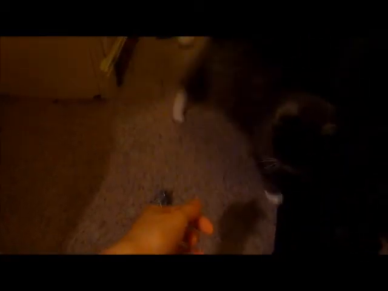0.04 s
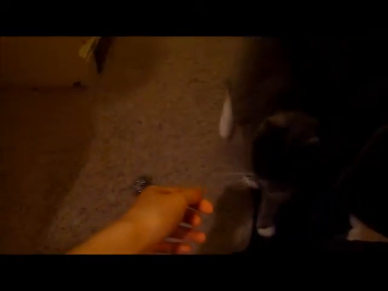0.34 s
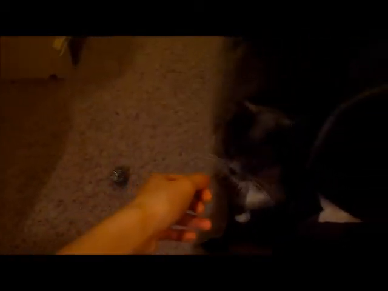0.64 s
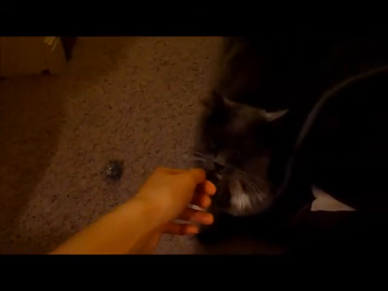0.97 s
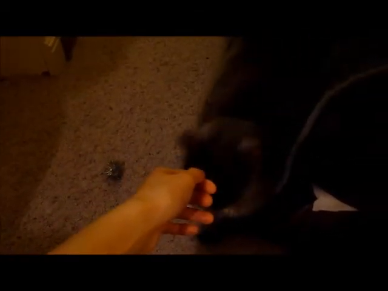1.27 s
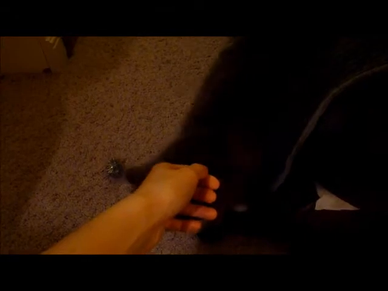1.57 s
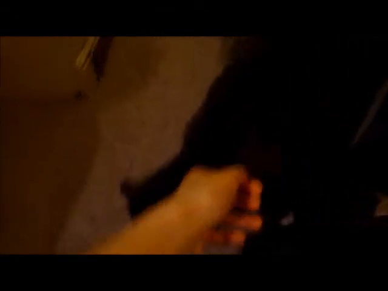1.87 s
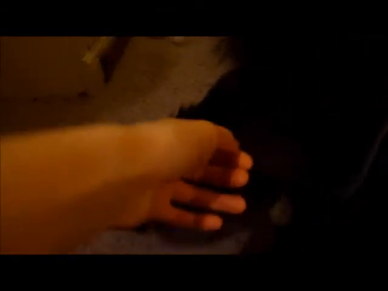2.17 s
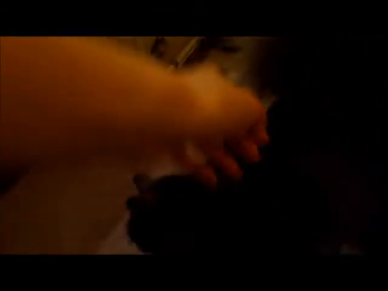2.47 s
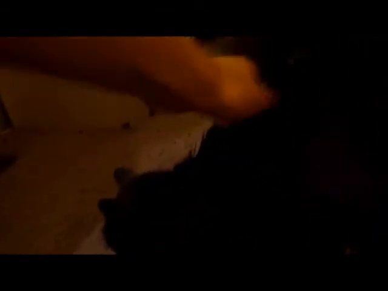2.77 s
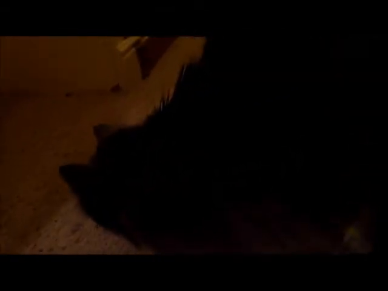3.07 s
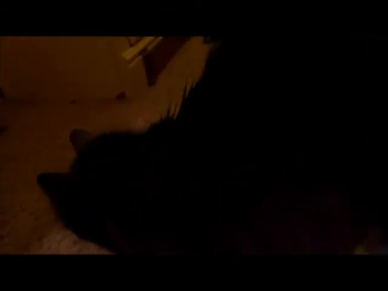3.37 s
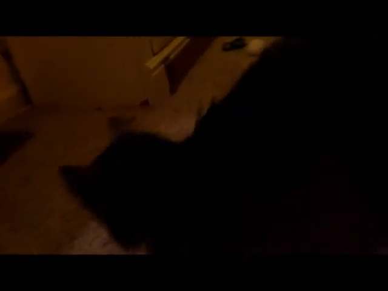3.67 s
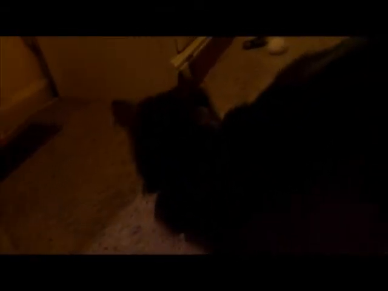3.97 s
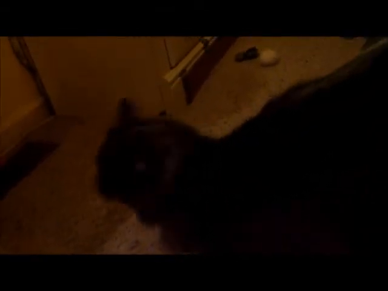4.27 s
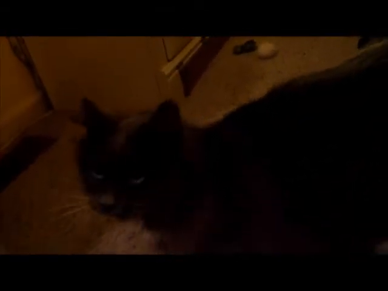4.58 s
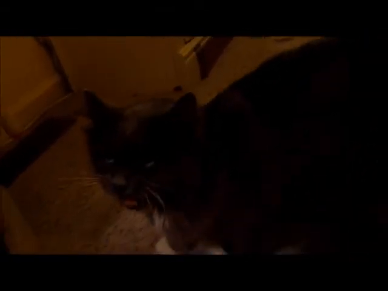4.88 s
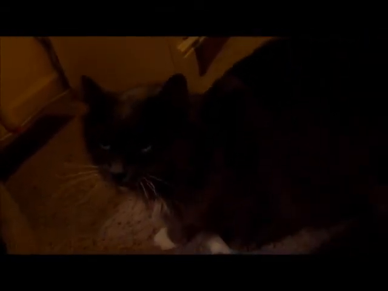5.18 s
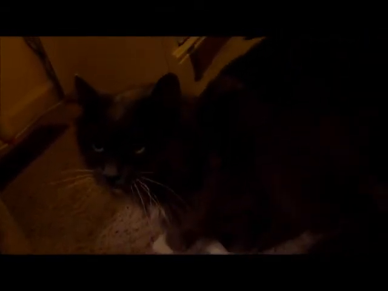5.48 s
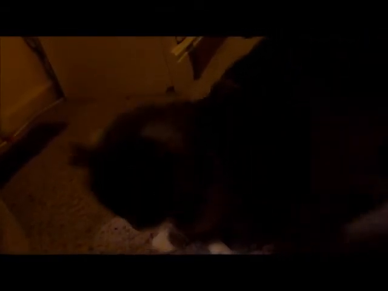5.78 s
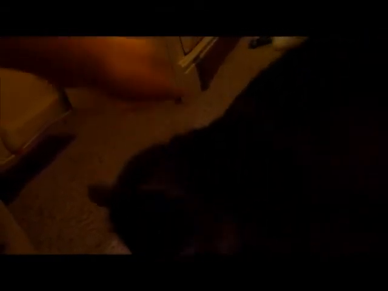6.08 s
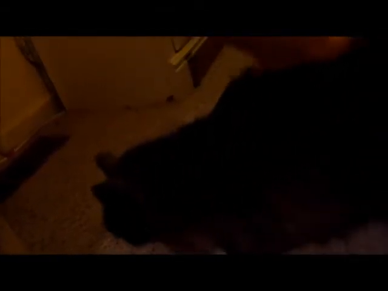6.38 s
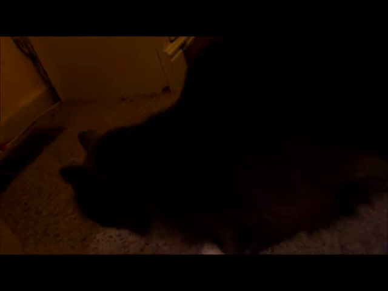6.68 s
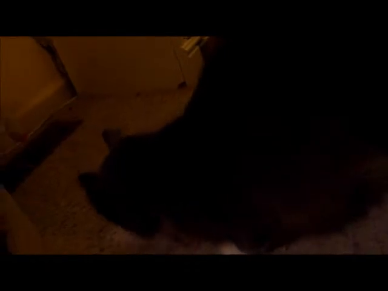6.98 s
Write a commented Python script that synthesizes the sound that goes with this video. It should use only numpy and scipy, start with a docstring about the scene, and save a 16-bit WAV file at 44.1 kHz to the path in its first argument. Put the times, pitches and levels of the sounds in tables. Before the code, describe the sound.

A quiet, carpeted room is heard through a small mono microphone, with low background noise, faint scattered shuffles and a thin fan whine that drops back after the first couple of seconds. A soft bump comes right at the start. At about 1.4 seconds a nearby cat gives a short, bright call that begins as a rolled nasal trill and rises in pitch. From 1.7 to 2.6 seconds a hand strokes its fur, with small sharp clicks and soft bumps close to the microphone. A lower, rolling chirrup follows from 3.3 to 3.8 seconds. At about 4.5 seconds comes the fullest and loudest call, a trill that climbs into an open, slightly raspy meow and ends just after 5 seconds. A last soft, rising trilled murmur sounds from 6.1 to 6.5 seconds, leaving only the quiet room.

```python
"""A fan whines faintly in a quiet room, with light shuffles and one soft bump near a small mono camera.
Close by, a cat gives four short rising calls. Each starts as a rolled trill hummed through the nose,
then brightens and turns a little raspy as the mouth opens. Between the first two calls a hand
strokes its fur, with small clicks and soft bumps near the microphone."""
import sys
import numpy as np
from scipy import signal
from scipy.fft import rfft, irfft, next_fast_len
from scipy.io import wavfile

SR = 44100
rng = np.random.default_rng(int(sys.argv[2]) if len(sys.argv) > 2 else 0)


def unload_wav(signal):
    """Save mono or channel-first audio to the path in sys.argv[1] as 16-bit WAV at rate SR, clipped to [-1, 1]."""
    wavfile.write(
        sys.argv[1],
        SR,
        np.round(np.clip(np.atleast_2d(signal).T, -1, 1) * 32767).astype(np.int16),
    )


N = 314874
T = np.arange(N) / SR


def undb(db):
    return 10 ** (np.asarray(db) / 20)


def unit(x):
    return x / np.sqrt(np.mean(x ** 2))


def ramp(t, length_s):
    """Rise from 0 at t = 0 to 1 after length_s, and stay there."""
    return np.clip(t / length_s, 0, 1)


def eq_gain(points, hz):
    """Gain of an EQ curve of (Hz, dB) points at the given frequencies."""
    f, db = np.transpose(points)
    return undb(np.interp(np.log(np.maximum(hz, 1)), np.log(f), db))


def colour(x, points):
    """Pass x through an EQ curve and set it to rms 1."""
    size = next_fast_len(N)
    hz = np.arange(size // 2 + 1) * SR / size
    return unit(irfft(rfft(x, size) * eq_gain(points, hz), size)[:N])


def drift(rate):
    """Random modulator at rms 1, gliding to a new value rate times a second."""
    knots = rng.standard_normal(N // 8)
    return unit(np.interp(T * rate, np.arange(len(knots)), knots))


def add(out, s, sound):
    """Mix a sound in at time s."""
    i = int(s * SR)
    out[i:i + len(sound)] += sound[:N - i]


# EQ of the room tone: (frequency [Hz], gain [dB])
ROOM_TONE_EQ = [(18, -34), (30, -7.5), (33, -13), (53, -5), (134, 0), (239, -1), (387, -4), (477, -5),
                (673, -7), (909, -8), (996, -7), (1250, -11.5), (1440, -12), (2230, -17), (7400, -24.5),
                (9620, -32.5), (16300, -120)]
def room_tone(level_db=-49):
    """A dark bed of noise whose level barely wanders."""
    return colour(rng.standard_normal(N), ROOM_TONE_EQ) * undb(level_db + 0.58 * drift(1.2))


def fan(hz=1020, width_hz=28, near_db=-59, far_db=-66.5, swing_at_s=0.9, swing_length_s=1.5):
    """A narrow, unsteady whine that drops back as the camera swings away."""
    phase = 2 * np.pi * hz * T
    whine = unit(drift(width_hz) * np.sin(phase) + drift(width_hz) * np.cos(phase))
    return whine * undb(near_db + (far_db - near_db) * ramp(T - swing_at_s, swing_length_s))


def soft_contact(t, hz, decay_s):
    """A padded touch: one tone that swells for a moment and dies away."""
    age = np.log(1000) * t / decay_s
    return age * np.exp(1 - age) * np.sin(2 * np.pi * hz * t)


def shuffles(per_second=2.6, top_db=-47, spread_db=1, centre_hz=950, decay_s=0.011):
    """Paws and hand shift about in faint ticks, scattered over an octave."""
    out, t = np.zeros(N), T[:SR // 15]
    for s, softness, pitch in rng.random((80, 3)) * [80 / per_second, 1, 1]:
        if s < T[-1]:
            tick = soft_contact(t, centre_hz * 2 ** (pitch - .5), decay_s)
            add(out, s, undb(top_db - spread_db * softness) * tick)
    return out


# Soft bumps: (time [s], envelope peak [dB], pitch [Hz], decay [s])
BUMP_HITS = [(0.1548, -34, 98.3, 0.1), (1.7285, -18.5, 223, 0.0075), (1.7770, -33, 547, 0.0082),
             (1.795, -32, 300, 0.011), (1.852, -31.5, 338, 0.011), (1.8705, -30, 149, 0.0099),
             (2.0260, -35, 520, 0.0074), (2.0815, -32, 497, 0.011), (2.0958, -24.5, 160, 0.017),
             (2.1745, -28, 420, 0.0055), (2.5237, -24, 352, 0.023), (2.5296, -27.5, 523, 0.013),
             (2.5340, -19.5, 54.6, 0.011), (2.5510, -30.5, 543, 0.0067)]
def bumps():
    """Padded knocks at the microphone, each gone within a few cycles."""
    out, t = np.zeros(N), T[:SR // 3]
    for s, db, hz, decay_s in BUMP_HITS:
        add(out, s, undb(db) * soft_contact(t, hz, decay_s))
    return out


# Pitch and level envelope of each call: (time [s], pitch [Hz], level of the fundamental [dB])
GREETING_CURVE = [(1.35, 515, -69), (1.362, 506.5, -53), (1.422, 732, -49), (1.464, 714, -42),
                  (1.546, 922, -35), (1.6, 929.9, -32.5), (1.684, 925.1, -36.5), (1.8, 909, -52.5),
                  (1.81, 914.0, -77)]
CHIRRUP_CURVE = [(3.255, 458, -55), (3.285, 473, -49.5), (3.339, 500, -47.5), (3.46, 502, -45),
                 (3.55, 523, -42.5), (3.599, 523.5, -49.5), (3.626, 553.5, -39.5), (3.665, 537, -47.5),
                 (3.745, 567, -47.5), (3.81, 550, -69)]
MEOW_CURVE = [(4.53, 433, -57), (4.6, 530, -40), (4.69, 540.5, -42.5), (4.746, 654, -35),
              (4.785, 693.4, -38), (4.849, 782, -33), (4.934, 914, -35.5), (4.964, 1023, -27.5),
              (5.044, 984, -31), (5.069, 946, -44), (5.15, 870, -77)]
MURMUR_CURVE = [(6.09, 458.6, -56), (6.14, 503.5, -52), (6.205, 536, -46), (6.235, 580, -42),
                (6.315, 641.6, -40), (6.404, 688, -41), (6.42, 575, -50), (6.443, 586, -48),
                (6.468, 550, -68)]
# Mouth formants and rasp EQ, mouth half or wide open: (frequency [Hz], gain [dB])
HALF_MOUTH_EQ = [(1000, -29), (2200, 3), (2750, 5.5), (3050, -7.5), (3350, 2.5), (3700, 0), (4300, -29),
                 (5000, -1), (5800, -12), (6600, -12.5), (7600, -16)]
WIDE_MOUTH_EQ = [(1200, -26), (2200, 5), (2650, -3), (3050, -0.5), (3600, 5.5), (4000, -8), (4500, -2.5),
                 (4900, -11.5), (5500, -2.5), (6200, -20), (6800, -5), (7600, -20.5)]
HALF_RASP_EQ = [(400, -15), (1000, 0), (1700, -3.5), (3200, 7.5), (4500, -12.5), (5800, 3.5), (6700, 7.5),
                (7800, -18.5)]
WIDE_RASP_EQ = [(400, -21.5), (1000, 1), (2000, 1), (3300, 6), (4500, -3.5), (5200, 8.5), (5800, 6.5),
                (6600, 0.5), (7800, -16.5)]
# Rolled start of each call: (time of one crest [s], rate [Hz], vibrato depth [share of pitch],
# tremolo depth [dB], pitch at which the roll is half gone [Hz])
CALL_TRILLS = [(1.436, 28.3, .055, 4, 707), (3.552, 28.27, .08, 0.5, 700), (4.648, 38.5, 0.041, 1, 656),
               (6.241, 25.6, .07, 4, 604)]
# Mouth move of each call: (opens [s], widest [s], shut by [s], overtone rise until widest [dB/s])
CALL_MOUTH_MOVES = [(1.417, 1.697, 1.815, 17), (3.605, 3.68, 3.95, 63), (4.697, 4.97, 5.11, 57),
                    (6.287, 6.394, 6.9, 52)]
# Timbre of each call: (nose level [dB re fundamental], throat formant [Hz], its width [Hz],
# its level [dB], its sag [dB/s], mouth level [dB], mouth treble shelf [dB])
CALL_TIMBRES = [(-6, 1450, 210, -36.5, 10, -54, -2), (-7.5, 1570, 480, -42.5, 62, -67, -2),
                (-2, 1570, 500, -38, 19, -44, 4.5), (-21, 1360, 280, -48, 14, -61, 3)]
# Rasp in each call: (start [s], attack [s], level with the mouth at its widest [dB])
CALL_RASPS = [(1.415, 0.014, -54.5), (3.595, 0.035, -60.5), (4.705, 0.13, -45.5), (6.255, 0.041, -52)]
def cat():
    """A bright greeting, a rolling chirrup, a full meow and a soft murmur; only the meow opens wide."""
    curves = GREETING_CURVE, CHIRRUP_CURVE, MEOW_CURVE, MURMUR_CURVE
    mouth_eqs = HALF_MOUTH_EQ, HALF_MOUTH_EQ, WIDE_MOUTH_EQ, HALF_MOUTH_EQ
    rasp_eqs = HALF_RASP_EQ, HALF_RASP_EQ, WIDE_RASP_EQ, HALF_RASP_EQ
    calls = zip(curves, CALL_TRILLS, CALL_MOUTH_MOVES, CALL_TIMBRES, CALL_RASPS, mouth_eqs, rasp_eqs)
    return sum(call(*parts) for parts in calls)


NOSE_HZ, NOSE_WIDTH_HZ, NOSE_OPEN_SHARE = 1080, 620, 0.16  # the share left once the lips part
OPEN_S, SHUT_S, JAW_DROP_S, CRACK_S, RASP_RELEASE_S = 0.022, 0.039, 0.052, 0.02, 0.055
CLOSING_DB_PER_S, RASP_SLOPE_DB_PER_S = 70, 10
TRILL_FADE_HZ, THIN_ABOVE_HZ, THIN_DB_PER_OCTAVE = 22, 886, 78.5
JITTER, CRACK_JITTER, WAVER = 0.005, 0.028, 0.0054  # shares of pitch
def call(curve, trill, mouth_move, timbre, rasp_swell, mouth_eq, rasp_eq, throb=2.1, shimmer_db=3):
    """Vocal folds hum through the nose, then sound through throat and mouth as the lips part."""
    times, *columns = np.transpose(curve)
    crest_s, trill_hz, trill_depth, tremolo_db, roll_limit_hz = trill
    opens_s, widest_s, shuts_s, rise_db_per_s = mouth_move
    nose_db, throat_hz, throat_width_hz, throat_db, sag_db_per_s, mouth_db, treble_db = timbre
    rasp_s, rasp_attack_s, rasp_db = rasp_swell
    on = (T > times[0]) & (T < times[-1])
    t = T[on]
    hz, db = (np.interp(t, times, column) for column in columns)

    # one flutter rolls pitch and loudness together, dying out as the pitch climbs
    rolling = 1 / (1 + np.exp((hz - roll_limit_hz) / TRILL_FADE_HZ))
    roll = rolling * np.cos(2 * np.pi * trill_hz * (t - crest_s) + 0.28 * drift(25)[on])
    depth, flutter = trill_depth * rolling, trill_depth * roll

    # the parting lips crossfade from nose to throat and mouth; the mouth is brightest at its widest
    parted = ramp(t - opens_s, OPEN_S)
    opening = parted * ramp(min(shuts_s, times[-1]) - t, SHUT_S) ** 2
    jaw = ramp(t - opens_s, JAW_DROP_S)
    from_widest_s = np.abs(t - widest_s)
    mouth_slope = np.where(t < widest_s, rise_db_per_s, CLOSING_DB_PER_S)
    nose_gain = undb(db + nose_db) * (1 - (1 - NOSE_OPEN_SHARE) * parted)
    throat_gain = opening * undb(throat_db - sag_db_per_s * (t - opens_s))
    mouth_gain = opening * jaw * undb(mouth_db - mouth_slope * from_widest_s)
    # tightly stretched folds lose their highest overtones
    shelf_db = treble_db - THIN_DB_PER_OCTAVE * np.maximum(np.log2(hz / THIN_ABOVE_HZ), 0)

    # the folds beat less evenly in the roll, and when the voice cracks as the lips part
    crack = np.exp(-((t - opens_s - OPEN_S) / CRACK_S) ** 2)
    jitter = (JITTER + 0.13 * depth + CRACK_JITTER * crack) * drift(300)[on]
    hz = hz * (1 + flutter + jitter + WAVER * drift(60)[on])
    phase = 2 * np.pi * np.cumsum(hz) / SR
    voice = np.sin(phase) * undb(db + (1.2 + 16 * depth) * drift(130)[on])
    for k in range(2, 15):
        overtone_hz = k * hz
        nose = nose_gain / (1 + ((overtone_hz - NOSE_HZ) / NOSE_WIDTH_HZ) ** 2) ** 2
        throat = throat_gain / (1 + ((overtone_hz - throat_hz) / throat_width_hz) ** 2) ** 2
        shelf = undb(shelf_db * np.clip((overtone_hz - 4000) / 1000, 0, 1))
        mouth = mouth_gain * shelf * eq_gain(mouth_eq, overtone_hz)
        gain = (nose + throat + mouth) * np.exp(throb * flutter)  # swells on each crest of the roll
        shimmer = undb(shimmer_db * np.sqrt(min(k, 6) / 3) * drift(70)[on])
        voice += gain * shimmer * np.sin(k * phase + rng.uniform(0, 2 * np.pi))

    # rasp: turbulence at the folds, pulsing once a cycle
    turbulence = colour(rng.standard_normal(N), rasp_eq)[on]
    rasp = turbulence * unit(1 + 1.3 * np.cos(phase)) * undb(2.4 * drift(120)[on])
    rasp_envelope = ramp(t - rasp_s, rasp_attack_s) * ramp(times[-1] - t, RASP_RELEASE_S)
    rasp *= rasp_envelope * undb(rasp_db - RASP_SLOPE_DB_PER_S * from_widest_s)
    out = np.zeros(N)
    out[on] = (voice * np.sqrt(2) + rasp) * undb(tremolo_db * roll)
    return out


# Sharp clicks: (time [s], peak of the ring [dB], brightest frequency [Hz], t60 [s])
CLICK_HITS = [(1.7197, -15, 3700, 0.0034), (1.8719, -25, 1020, 0.014), (2.0360, -31.5, 2220, 0.013),
              (2.097, -16.5, 1520, 0.017), (2.1760, -22.5, 2900, 0.0043), (2.3748, -34.5, 5100, .009),
              (2.3875, -29, 2800, 0.013), (2.5165, -19.5, 3500, 0.019), (2.5182, -17, 885, 0.0092),
              (2.526, -29.5, 2980, 0.017), (2.529, -28, 4500, 0.011)]
# Modes that the clicks ring: (frequency [Hz], level [dB], decay [multiple of the click's t60])
CLICK_RESONANCES = [(477, 5, 1.6), (978, 2, 1.57), (1950, 2, 1.05), (2450, 4.5, 0.43), (3340, -3, 0.97),
                    (3910, -6.5, 1.6), (4570, 4, 0.43), (6350, -6.5, 1), (7000, -10.5, 0.79)]
def clicks(snap_gain=0.12, focus_octaves=0.86, attack_s=0.00034):
    """A snap of noise and a few damped modes; each click favours the modes near its own brightest frequency."""
    out, t = np.zeros(N), T[:SR // 20]
    for s, db, bright_hz, t60 in CLICK_HITS:
        ring = np.zeros(len(t))
        for k, (hz, mode_db, decay_scale) in enumerate(CLICK_RESONANCES):
            gain = undb(mode_db) / (1 + (np.log2(hz / bright_hz) / focus_octaves) ** 2)
            decay = np.exp(-np.log(1000) * t / (t60 * decay_scale))
            ring += (-1) ** k * gain * decay * np.sin(2 * np.pi * hz * t)
        ring *= 1 - np.exp(-t / attack_s)
        snap = snap_gain * rng.standard_normal(len(t)) * np.exp(-np.log(1000) * t / t60)
        add(out, s, undb(db) * (ring / np.abs(ring).max() + snap))
    return out


# EQ of rubbed fur: (frequency [Hz], gain [dB])
FUR_EQ = [(40, -4), (150, 1), (500, -2), (950, -0.5), (1400, -8), (1800, -8), (2500, -12.5), (4200, -18.5),
          (5200, -25.5), (6600, -20), (7800, -28)]
# Rubs of the hand: (time [s], length [s], level [dB])
FUR_RUBS = [(1.75, 0.1, -46.5), (1.846, .048, -39), (1.898, 0.11, -55), (2.007, 0.046, -47.5),
            (2.062, 0.36, -50), (2.16, 0.083, -48.5), (2.378, .036, -48), (2.419, 0.13, -40.5),
            (2.511, 0.028, -35.5)]
def fur_stroke(grain_db=2.0, attack_s=0.0088, release_s=0.009):
    """Hairs slip past the hand in dense, uneven grains; each rub swells, holds and lets go."""
    grains = rng.standard_normal(N) * undb(grain_db * drift(500))
    rubs = [undb(db) * ramp(T - s, attack_s) * ramp(s + length_s - T, release_s)
            for s, length_s, db in FUR_RUBS]
    return colour(grains, FUR_EQ) * np.linalg.norm(rubs, axis=0)


def room_reverb(x, t60=0.22, wet_db=-21, predelay_s=0.004):
    """The carpeted room adds a short, faint tail."""
    t = T[:SR // 2]
    tail = rng.standard_normal(len(t)) * np.exp(-np.log(1000) * t / t60) * (t > predelay_s)
    return x + undb(wet_db) * signal.fftconvolve(x, tail / np.linalg.norm(tail))[:N]


def scene():
    """Mono mix: cat and clicks get the reverb; the close touches and the background stay dry."""
    return (room_reverb(cat() + clicks()) + bumps() + fur_stroke() + shuffles() + room_tone() + fan())[None]


def record(dry):
    """The camera rolls off the top, cuts it steeply and adds a small DC offset."""
    rolloff_hz, cutoff_hz, dc_offset = 7350, 8000, 0.0266
    soft = signal.sosfilt(signal.butter(10, rolloff_hz, fs=SR, output="sos"), dry)
    return signal.sosfilt(signal.ellip(10, .2, 70, cutoff_hz, fs=SR, output="sos"), soft) + dc_offset


dry = scene()
out = record(dry)
unload_wav(out)
```